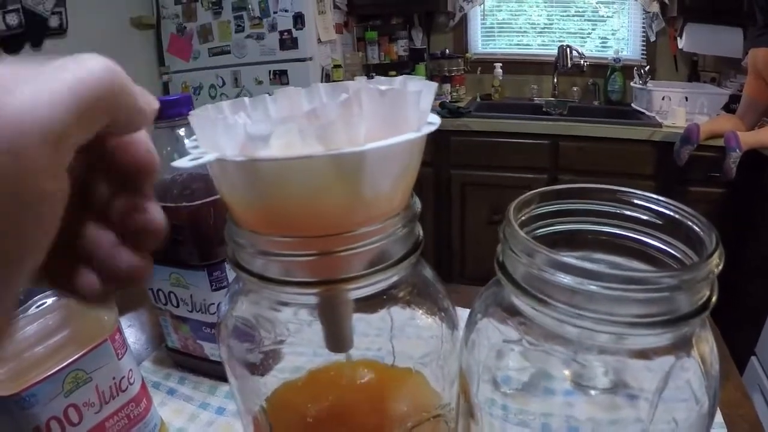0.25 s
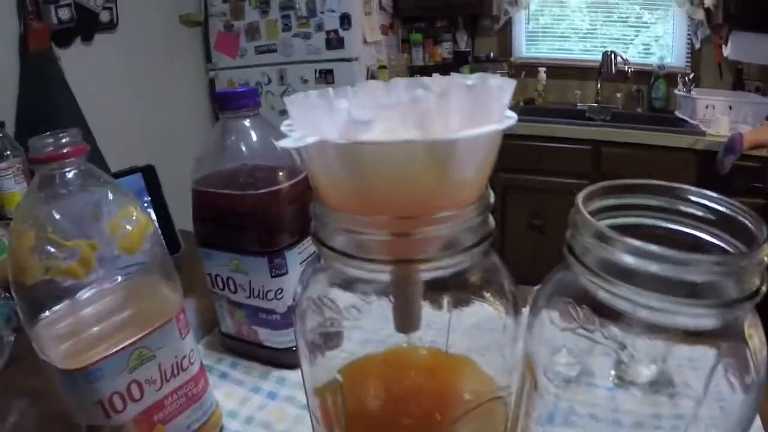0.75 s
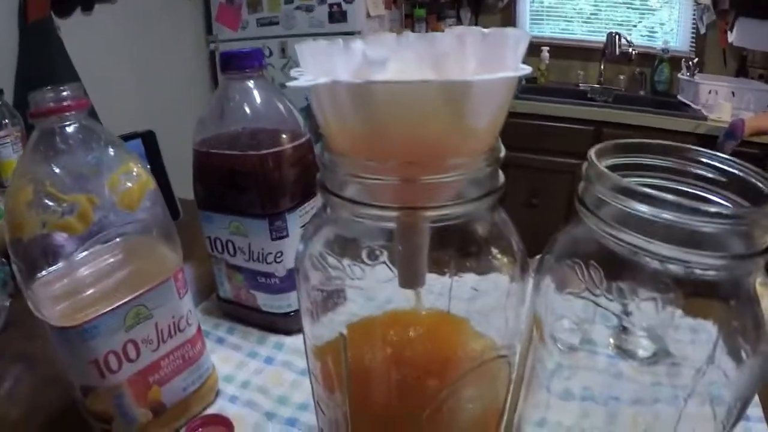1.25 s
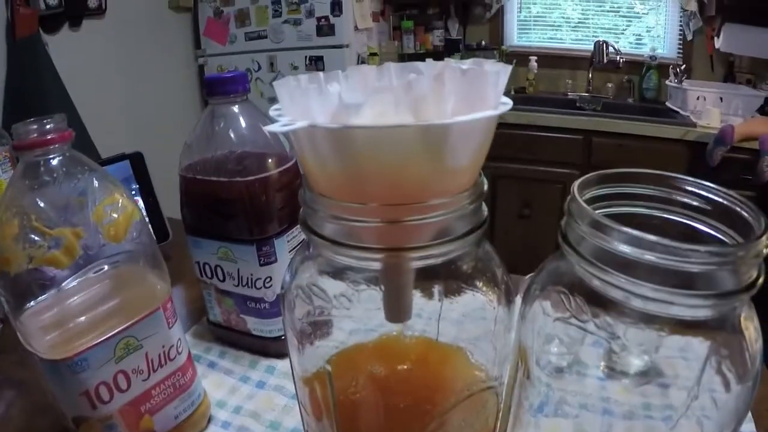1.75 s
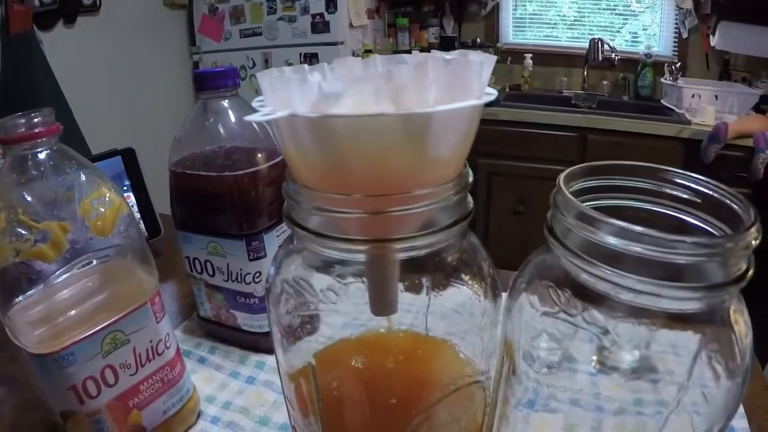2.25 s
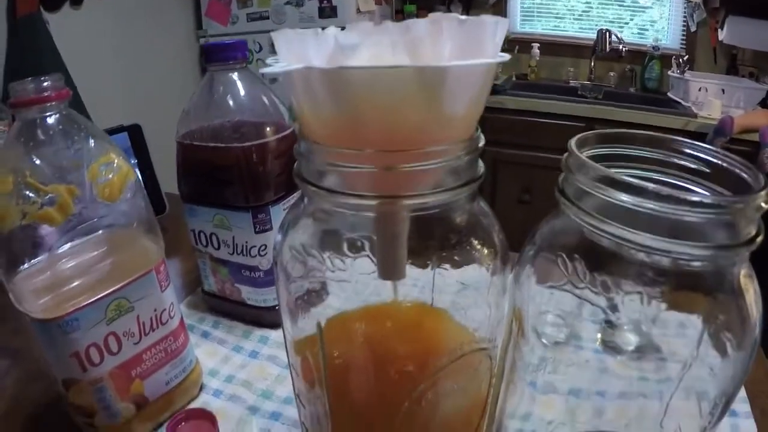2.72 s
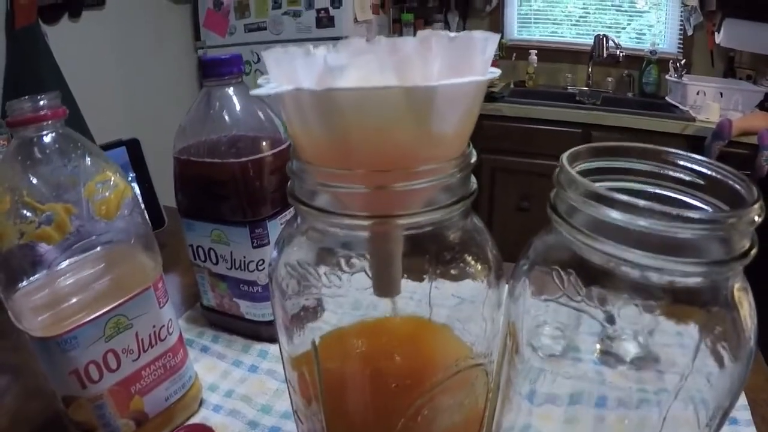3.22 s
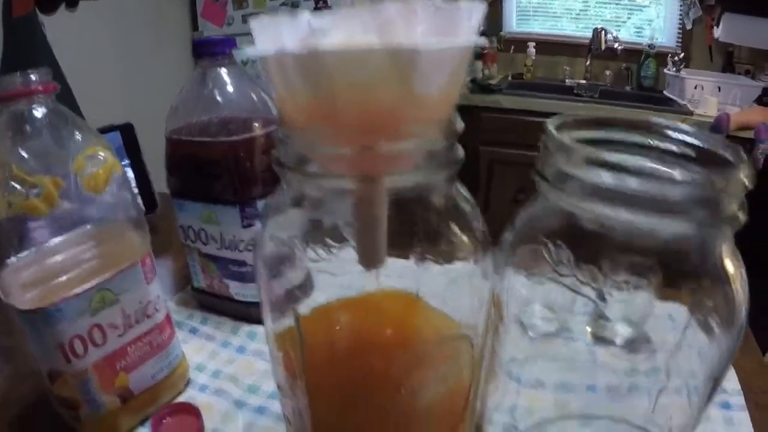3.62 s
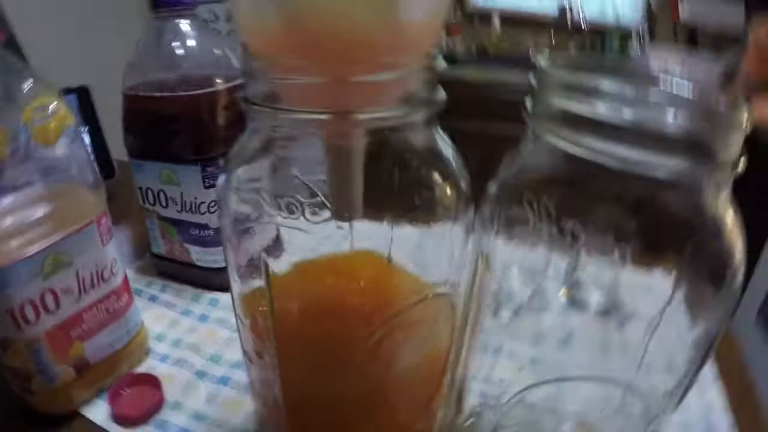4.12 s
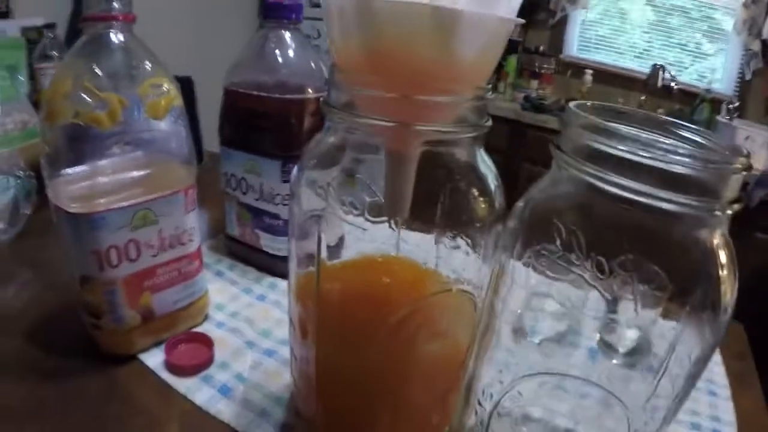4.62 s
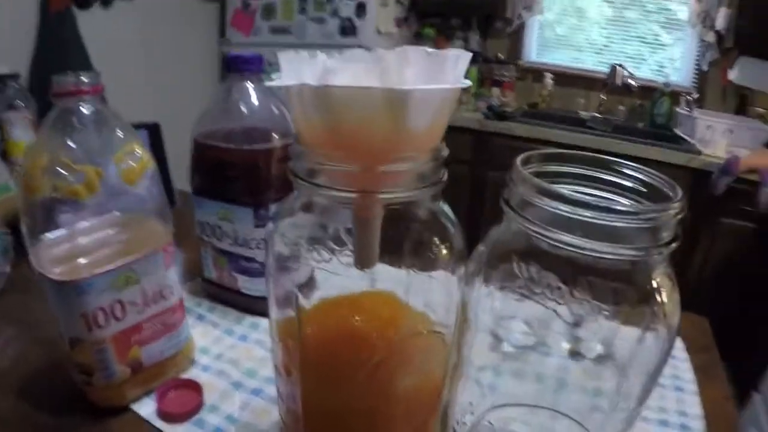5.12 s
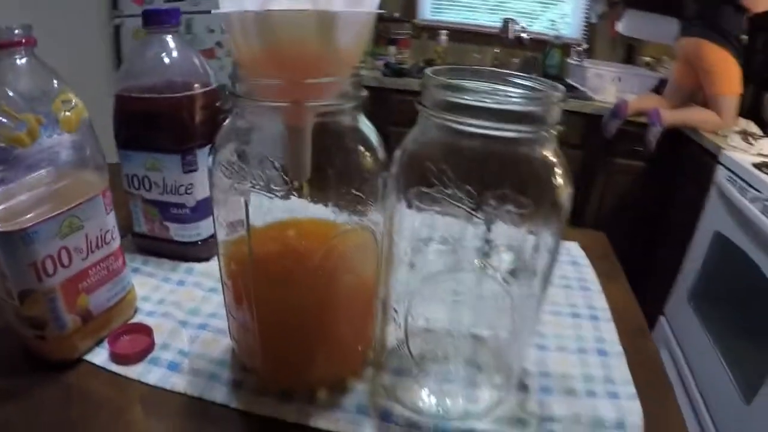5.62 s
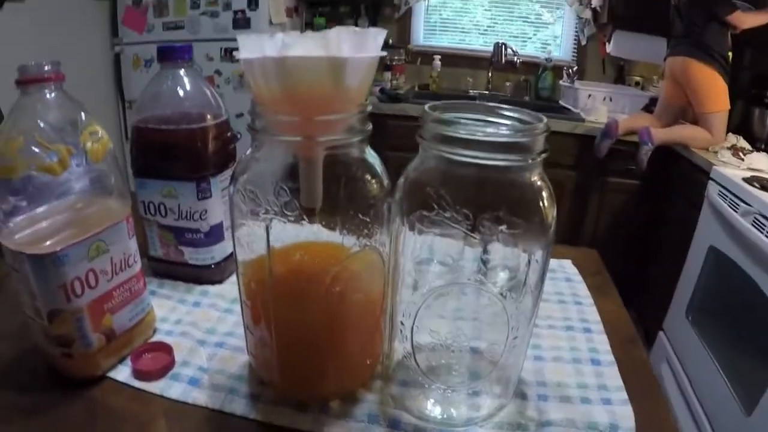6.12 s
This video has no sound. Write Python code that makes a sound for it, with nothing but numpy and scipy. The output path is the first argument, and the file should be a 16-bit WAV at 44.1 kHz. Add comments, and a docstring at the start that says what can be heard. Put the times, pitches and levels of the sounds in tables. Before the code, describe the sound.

Juice drips and plinks into a glass jar over a low kitchen hum, with a few bumps and a sharp close click.

```python
"""Juice dripping into a glass jar

Juice drips and trickles from a paper-lined funnel: drops trap bubbles that plink, and the jar rings
with them. Up close, sleeves rustle and fingers click on the recorder's case. Farther off, someone
treads softly and bumps about at the counter. Underneath lie fan noise and the hum of kitchen
appliances, which swells and sinks as the microphone moves through the room."""
import sys
import numpy as np
from scipy import signal
from scipy.fft import rfft, irfft, next_fast_len
from scipy.io import wavfile
from scipy.ndimage import uniform_filter1d

SR = 44100
rng = np.random.default_rng(int(sys.argv[2]) if len(sys.argv) > 2 else 0)


def store_pcm(level_fs):
    """Save levels as 16-bit WAV."""
    pcm = np.round(np.clip(level_fs, -1, 1) * 32767).astype(np.int16)
    wavfile.write(sys.argv[1], SR, np.atleast_2d(pcm).T)


N = 280917
T = np.arange(N) / SR

# The featured drops. Each row: start in seconds, bubble pitch in Hz, level in dB, t60 in seconds.
DROPS = [(.319, 1938, -47.5, 0.046), (.409, 1890, -34.5, 0.064), (0.551, 1286, -52.5, .065),
         (.696, 2000, -55, 0.032), (.975, 2320, -49, 0.022), (.975, 1890, -49, .025),
         (.994, 1900, -54.5, 0.26), (1.053, 1845, -53, 0.05), (1.121, 3970, -54.5, 0.05),
         (1.289, 2570, -56, .045), (1.310, 5170, -58, 0.074), (1.44, 3050, -48.5, .055),
         (1.440, 5080, -57, 0.065), (1.819, 5160, -56, 0.065), (1.945, 6120, -65, .06),
         (2.879, 1482, -53.5, 0.13), (3.108, 1480, -56, .08), (3.117, 1903, -56, 0.3),
         (3.251, 1441, -53, 0.19), (3.427, 3825, -48.5, 0.13), (3.494, 1890, -56, 0.14),
         (3.63, 2770, -52, .035), (3.711, 1946, -45, 0.041), (4.07, 1937, -42, 0.09),
         (4.483, 3325, -45, 0.021), (4.514, 5700, -62, 0.055), (4.604, 3763, -45, 0.23),
         (4.711, 2540, -44.5, 0.026), (4.750, 5300, -63, .06), (4.988, 1670, -45, .025),
         (5.401, 1907, -57, 0.095), (5.965, 2910, -42.5, 0.018), (6.025, 1920, -52, 0.13)]
# The glass jar's modes. Each row: pitch in Hz, relative level in dB, t60 in seconds.
JAR_MODES = [(1448, -7, .8), (1723, -1, .45), (1771, -3, .6), (1915, -1.5, .28), (2480, -3, .4),
             (2595, -12, .6), (3596, -16, .7), (3750, 0, .22), (3830, -6, .2), (5060, -4, .2),
             (5850, -9, .12)]
# Bursting bubbles. Each row: start in seconds, relative level in dB.
BURSTS = [(.408, -59), (.9745, -56), (1.438, -53), (4.988, -55)]
# The thin stream's strength. Each row: time in seconds, relative level in dB.
FLOW = [(0, 0.5), (.7, 0.5), (1.1, 3), (1.7, -1), (4.5, 1), (6.37, 0.5)]
# Resonances the stream keeps singing. Each row: centre in Hz, width in Hz, relative level in dB.
STREAM_RESONANCES = [(1844, 200, -1), (2450, 200, -13.5), (2600, 18, -8.5), (3600, 26, -5.5),
                     (3694, 160, -9.5)]
# Sleeve strokes. Each row: start in seconds, length in seconds, level in dB.
SLEEVE_STROKES = [(0.8, 0.063, -66.5), (2.844, 0.16, -63), (3.815, 0.078, -59), (3.923, 0.096, -58),
                  (4.034, 0.044, -52.5), (4.174, 0.11, -54.5), (4.542, 0.12, -62), (4.675, 0.15, -65),
                  (4.95, 0.11, -59.5), (5.523, .27, -64), (5.825, 0.24, -67.5), (6.197, 0.24, -64)]
# The colour of sliding cloth. Each row: frequency in Hz, relative density in dB.
CLOTH_COLOUR = [(900, -12), (1700, -12.5), (2500, -1.5), (3700, -5.5), (4600, -15.5), (6300, -13.5),
                (7600, -58), (9800, -24), (11000, -32), (15000, -44)]
# Finger taps on the case. Each row: start in seconds, level in dB.
FINGER_TAPS = [(3.815, -42), (4.165, -51), (4.1816, -24.5)]
# The case's modes. Each row: pitch in Hz, relative level in dB, t60 in seconds.
CASE_MODES = [(597, -1, 0.013), (1110, 10, 0.0051), (2370, 5, 0.01), (3720, -5.5, 0.01), (5470, 4, 0.003)]
# Bumps at the counter. Each row: start in seconds, level in dB, treble attack in seconds,
# bass t60 and treble t60 in seconds, relative level of the crack in dB.
BUMPS = [(2.655, -32, 0.013, 0.65, 0.64, -3), (3.186, -40.5, 0.022, 0.23, 0.32, 6),
         (4.83, -35, 0.0048, 0.43, 0.38, 7), (6.160, -24, 0.006, 0.39, 0.23, -1)]
# One spectrum for each bump. Each row in it: frequency in Hz, relative density in dB.
BUMP_COLOURS = [
    [(110, -16), (190, -0.5), (355, -23), (422, -7.5), (651, -23), (774, -22), (1020, -26), (1150, -26.5),
     (1470, -34.5), (3380, -36), (12000, -63), (15600, -88), (22000, -120)],
    [(260, -44.5), (450, -5), (757, -2), (1160, -4.5), (2120, -13), (3560, -14), (4160, -21), (6250, -21),
     (13000, -45)],
    [(140, -5), (230, -7), (285, -19), (397, -1), (621, -26), (822, -6), (1140, -25), (1350, -10),
     (1730, -20.5), (2040, -16), (2180, -20), (3650, -22.5), (12000, -58.5), (15600, -87), (22000, -120)],
    [(29, -40), (50, 6), (109, -23), (185, 2.5), (264, -14), (420, -10), (513, -21.5), (731, -16),
     (1520, -22.5), (1740, -21), (2950, -24), (3450, -33), (10000, -72), (13000, -99), (22000, -120)],
]
# A dish's modes. Each row: pitch in Hz, relative level in dB, t60 in seconds.
DISH_MODES = [(401, -2, 0.35), (813, 3.5, 0.2), (890, -19, .17), (1344, -16, .13), (1410, -5, .25),
              (1950, -12.5, 0.65), (2740, 10, 0.023), (2880, -14, 0.56), (5300, -8, 0.061),
              (5900, -13, 0.12)]
# Footfalls. Each row: start in seconds, level in dB.
FOOTFALLS = [(2.434, -35), (2.478, -33), (2.643, -26), (2.698, -28.5), (2.898, -40)]
# The floor's modes. Each row: pitch in Hz, relative level in dB, t60 in seconds.
FLOOR_MODES = [(89.6, -9.5, 0.63), (142.3, 3, 0.3), (182, -6, 0.25), (309, -11.5, 0.25), (436, -12, 0.15)]
# Level rides as the microphone crosses the standing waves of a shaft tone, its octave and a drone.
# Each row: time in seconds, level in dB (the drone's before its trim).
SHAFT_RIDE = [(0, -53), (.7, -49.5), (1.2, -66), (1.6, -51.5), (3, -45), (6.37, -48)]
OCTAVE_RIDE = [(0, -50), (1.15, -46.5), (1.6, -58), (1.9, -52), (2.6, -45.5), (6.37, -43.5)]
DRONE_RIDE = [(0.0, -46.5), (0.52, -44), (0.81, -64.5), (1.61, -43), (2.34, -47), (3.02, -41),
              (3.33, -50.5), (3.64, -42), (4.06, -48), (4.5, -37.5), (5.28, -46), (6.1, -37.5)]
# Weaker hum lines. Each row: pitch in Hz, rms level in dB.
HUM_LINES = [(85.3, -57), (141.8, -50.5), (170.5, -65), (180, -61.5), (242.5, -61.5), (246, -66.5),
             (339.5, -65.5), (353.5, -69.5), (411.5, -65.5), (444.5, -65.5)]
# The colour of the room tone. Each row: frequency in Hz, relative density in dB.
AIR_COLOUR = [(12, -27), (20, -2), (42, -3.5), (76, -14.5), (132, -6.5), (189, -12), (286, -16.5),
              (433, -17), (540, -25), (1020, -28.5), (1510, -38.5), (1830, -39), (2100, -38), (3650, -39.5),
              (15000, -52.5)]

DROP_HZ, DROP_DB, DROP_T60_S = 2200, -51.5, 0.063  # a typical drop


def drips(glide=0.016, heavy_s=0.409, heavy_db=-46.5, table_db=-7, room_db=-15):
    """Each drop splashes and traps a bubble, which wakes the jar's modes near its own pitch."""
    out, t = np.zeros(N), T[:SR]
    attack = 1 - np.exp(-t / 0.001)
    for start, hz, db, t60 in DROPS + stray_droplets():
        # a clean entry gives a long, strong bubble with little ring or splash; small ones spray more
        life_doublings, louder_db = np.log2(t60 / DROP_T60_S), db - DROP_DB
        ring_db = -11 - 0.5 * life_doublings - 0.44 * louder_db
        splash_db = -10 - 0.46 * louder_db + 5 * np.log2(hz / DROP_HZ)
        # the bubble sharpens slightly and dies ever faster as it rises
        age = t / t60
        pitch = hz * (1 + glide * (np.minimum(age, 1) - 0.5))
        bubble = np.sin(2 * np.pi * np.cumsum(pitch) / SR) * decay(age ** 1.27, 1)
        spray_colour = [(hz / 2, -19), (hz * 0.8, -9), (hz, 0), (hz * 1.3, -12), (15000, -28)]
        splash = undb(splash_db) * noise(spray_colour, SR) * decay(t, t60=0.06)
        glass = undb(ring_db) * jar_ring(hz, reach=0.054)
        add(out, start, undb(db) * attack * (bubble + glass + splash))
    # one heavy drop sets more of the jar singing
    add(out, heavy_s, undb(heavy_db) * attack * jar_ring(hz=1800, reach=0.13))
    # things on the table scatter the sound at once; the kitchen's tail lingers
    return out + undb(table_db) * reverb(out, t60=0.16) + undb(room_db) * reverb(out, t60=0.93)


def stray_droplets(count=12, around_s=1.3, spread_s=0.46, centre_hz=3120, octaves=0.91, level_db=-62):
    """Faint droplets fall at random moments and pitches, mostly early on; rows as in DROPS."""
    starts = np.abs(rng.normal(around_s, spread_s, count))
    pitches = centre_hz * 2 ** (octaves * np.tanh(rng.standard_normal(count)))
    return [(start, hz, level_db, DROP_T60_S) for start, hz in zip(starts, pitches)]


def jar_ring(hz, reach):
    """The glass rings mainly in the modes that lie within the fraction `reach` of a pitch."""
    woken = [(mode_hz, db - 10 * np.log10(1 + ((mode_hz / hz - 1) / reach) ** 4), t60)
             for mode_hz, db, t60 in JAR_MODES]
    return ring(woken, T[:SR])


def bubble_bursts(trim_db=-2):
    """A bursting bubble gives a very short, bright tick."""
    out, t = np.zeros(N), T[:SR // 10]
    for start, db in BURSTS:
        sizzle = band(rng.standard_normal(len(t)), hz=13800, width_hz=3500)
        add(out, start, undb(db + trim_db) * sizzle * decay(t, t60=0.0072))
    return out


def trickle(singing_db=-71.5, sputter_db=2, fizz_db=-79.5, fizz_growth=3.7):
    """The thin stream sputters faintly into the jar's resonances and fizzes as it swells."""
    flow_db = automation(FLOW)
    sputter = rng.standard_normal(N) * undb(sputter_db * wander(rate_hz=60))
    singing = sum(undb(db) * band(sputter, hz, width) for hz, width, db in STREAM_RESONANCES)
    fizz = band(sputter, hz=2460, width_hz=1050)
    return undb(singing_db + flow_db) * singing + undb(fizz_db + fizz_growth * flow_db) * fizz


def sleeve_rustles(body_db=-2.5, hiss_db=-12, grain_db=2.5):
    """Cloth slides in grainy strokes: a rub with a dull body and a thin hiss."""
    rub = noise(CLOTH_COLOUR, N)
    body = undb(body_db) * band(rng.standard_normal(N), hz=860, width_hz=550)
    hiss = undb(hiss_db) * band(rng.standard_normal(N), hz=5360, width_hz=1300)
    strokes = sum(undb(db) * np.exp(-(2 * (T - start) / length - 1) ** 4 / 2)  # flat-topped swells
                  for start, length, db in SLEEVE_STROKES)
    return strokes * (rub + body + hiss) * undb(grain_db * wander(rate_hz=250))


def case_clicks():
    """Fingers tap the recorder's case: dry clicks right at the microphone."""
    return strikes(FINGER_TAPS, CASE_MODES, attack_s=0.0014, length_s=0.1)


def counter_bumps(crossover_hz=700, bass_lag=2.3, dish_s=4.836, dish_db=-41):
    """Far blows arrive as a brief crack and a wash of room sound, whose bass builds later."""
    out, t = np.zeros(N), T[:SR]
    lowpass = signal.butter(2, crossover_hz, fs=SR, output="sos")
    for (start, db, attack_s, bass_t60, treble_t60, crack_db), colour in zip(BUMPS, BUMP_COLOURS):
        wash = noise(colour, SR)
        bass = signal.sosfiltfilt(lowpass, wash)
        treble = wash - bass
        bass_swell = fade_in(t, bass_lag * attack_s) * decay(t, bass_t60)
        treble_swell = fade_in(t, attack_s) * decay(t, treble_t60)
        crack = undb(crack_db) * fade_in(t, 0.0022) * decay(t, t60=0.012)
        add(out, start, undb(db) * (bass * bass_swell + treble * (treble_swell + crack)))
    add(out, dish_s, undb(dish_db) * ring(DISH_MODES, t))  # the third bump sets a dish ringing
    return out


def footsteps():
    """Soft footfalls make the floor boom."""
    return strikes(FOOTFALLS, FLOOR_MODES, attack_s=0.027, length_s=1)


def appliance_hum(shaft_hz=28.35, drone_hz=123.2, drone_trim_db=0.5):
    """One machine throbs at its shaft rate and the octave, another drones; weaker lines fill in."""
    shaft = hum_line(shaft_hz, automation(SHAFT_RIDE), waver_db=0.8, drift_hz=0.057)
    octave = hum_line(2 * shaft_hz, automation(OCTAVE_RIDE), waver_db=0.8, drift_hz=0.09)
    drone = hum_line(drone_hz, automation(DRONE_RIDE) + drone_trim_db, waver_db=2)
    return shaft + octave + drone + sum(hum_line(hz, db, waver_db=2.5) for hz, db in HUM_LINES)


def hum_line(hz, db, waver_db, drift_hz=0.3):
    """A sine that wavers a little in pitch and level."""
    pitch = hz + drift_hz * wander(rate_hz=1.998)
    phase = 2 * np.pi * (np.cumsum(pitch) / SR + rng.random())
    return np.sqrt(2) * undb(db + waver_db * wander(rate_hz=2.94)) * np.sin(phase)


def room_tone(level_db=-49, waver_db=0.043):
    """A soft, steady bed of fan and room noise."""
    return undb(level_db + waver_db * wander(rate_hz=7.1)) * noise(AIR_COLOUR, N)


def reverb(x, t60, predelay_s=0.0033):
    """A diffuse tail of reflections with about the energy of x."""
    t = T[:SR]
    tail = rng.standard_normal(SR) * decay(t, t60) * (t > predelay_s)
    return signal.fftconvolve(x, tail / np.linalg.norm(tail))[:N]


def strikes(hits, modes, attack_s, length_s):
    """One body rings at every (seconds, dB) hit."""
    out, t = np.zeros(N), T[:int(length_s * SR)]
    for start, db in hits:
        add(out, start, undb(db) * ring(modes, t) * fade_in(t, attack_s))
    return out


def ring(modes, t):
    """Struck modes dying away."""
    return sum(undb(db) * decay(t, t60) * np.sin(2 * np.pi * hz * t) for hz, db, t60 in modes)


def noise(colour, size):
    """Noise shaped by (Hz, dB) points; rms 1."""
    hz, db = np.transpose(colour)
    n = next_fast_len(size, real=True)
    bin_hz = np.arange(n // 2 + 1) * SR / n
    gain = undb(np.interp(np.log(bin_hz + 1), np.log(hz), db))
    return unit(irfft(rfft(rng.standard_normal(n)) * gain, n)[:size])


def band(x, hz, width_hz):
    """A resonance applied twice, for steep skirts; rms 1."""
    b, a = signal.iirpeak(hz, hz / width_hz, fs=SR)
    return unit(signal.lfilter(b, a, signal.lfilter(b, a, x)))


def wander(rate_hz):
    """Smooth random modulation; rms 1."""
    hold = int(SR / rate_hz)
    stepped = np.repeat(rng.standard_normal(N // hold + 1), hold)
    return unit(uniform_filter1d(uniform_filter1d(stepped, hold), hold)[:N])


def automation(points):
    """Join (seconds, value) points by straight lines."""
    return np.interp(T, *np.transpose(points))


def fade_in(t, attack_s):
    """A straight ramp up to full level."""
    return np.minimum(t / attack_s, 1)


def decay(t, t60):
    """An exponential fade, 60 dB down at t60."""
    return np.exp(-np.log(1000) * t / t60)


def add(out, start_s, x):
    """Mix x into out from start_s on."""
    i = max(int(start_s * SR), 0)
    out[i:i + len(x)] += x[:max(N - i, 0)]


def undb(db):
    """Decibels to gain."""
    return 10 ** (np.asarray(db) / 20)


def unit(x):
    """Scale to rms 1."""
    return x / np.sqrt(np.mean(x ** 2))


def scene():
    """The mono mix: juice in front, a person's movements around it, the kitchen underneath."""
    juice = drips() + bubble_bursts() + trickle()
    movement = sleeve_rustles() + case_clicks() + counter_bumps() + footsteps()
    kitchen = appliance_hum() + room_tone()
    return (juice + movement + kitchen)[None]


def record(dry):
    """The recorder cuts the top end steeply above 15.1 kHz."""
    return signal.sosfilt(signal.ellip(10, 0.2, 80, 15100, fs=SR, output="sos"), dry)


dry = scene()
out = record(dry)
store_pcm(out)
```